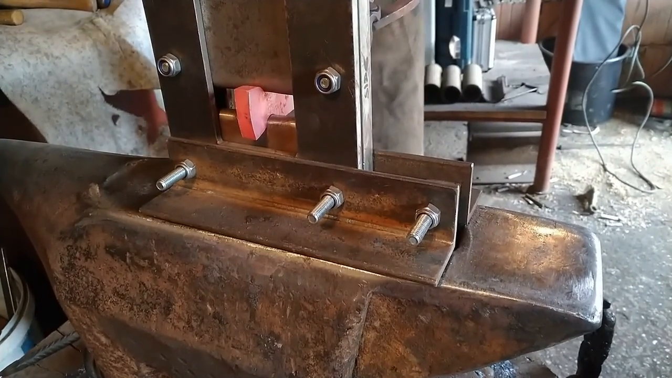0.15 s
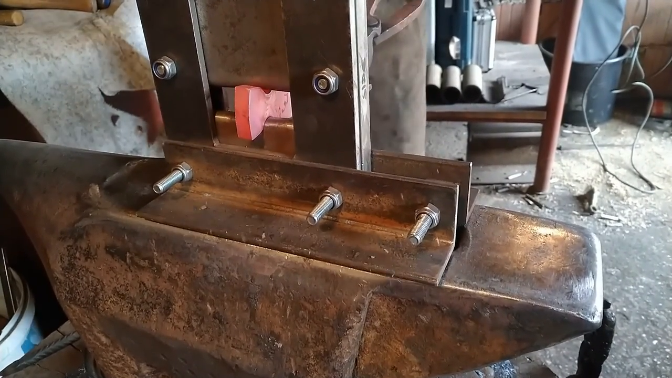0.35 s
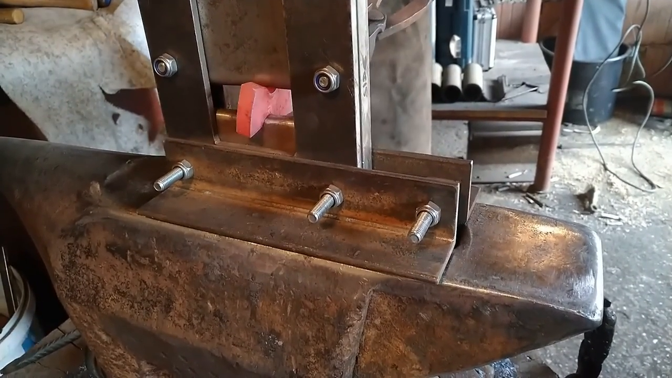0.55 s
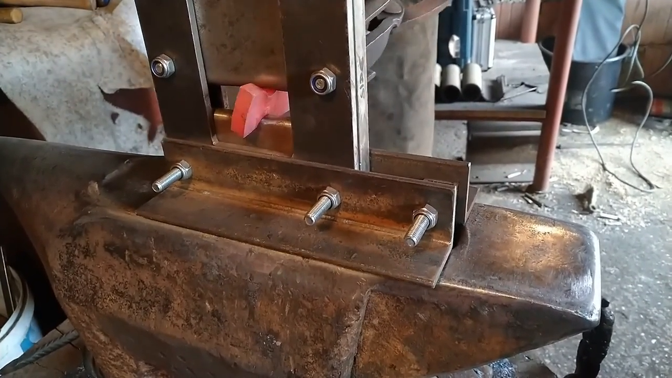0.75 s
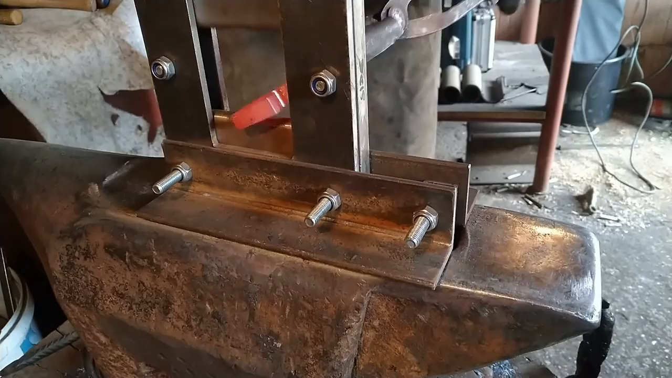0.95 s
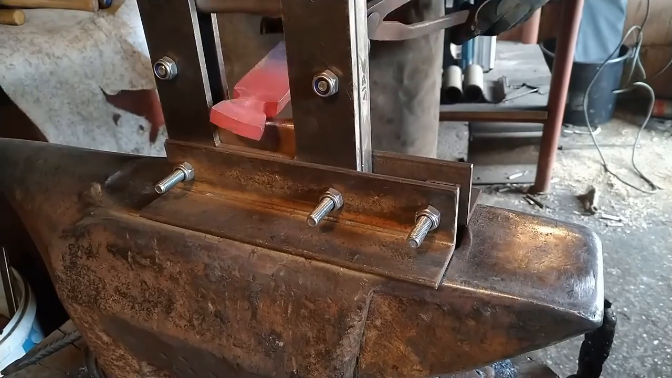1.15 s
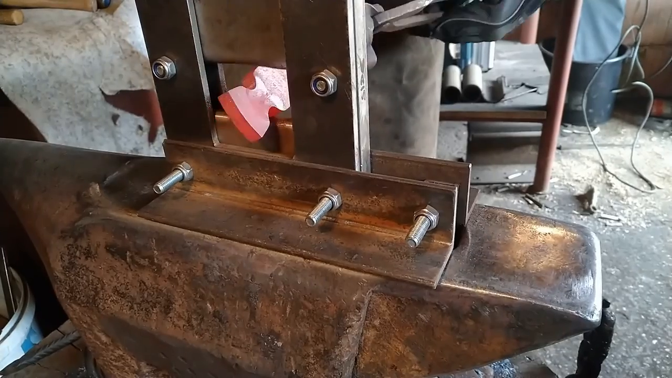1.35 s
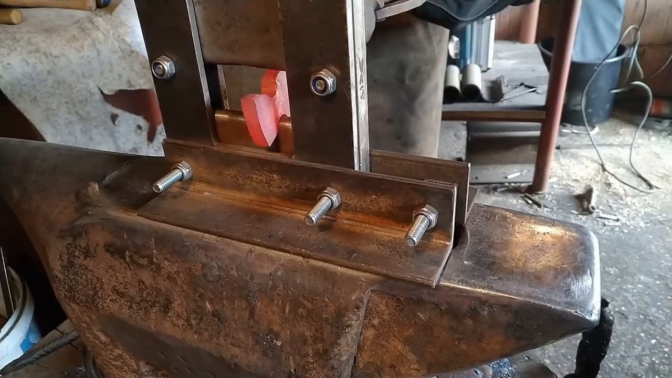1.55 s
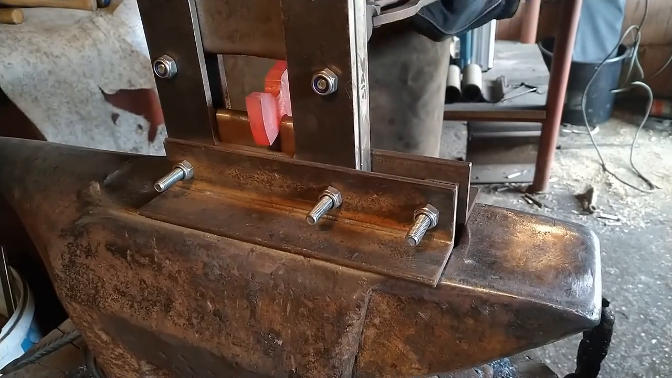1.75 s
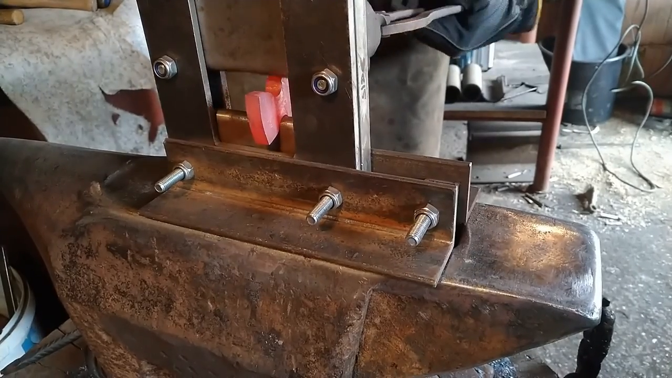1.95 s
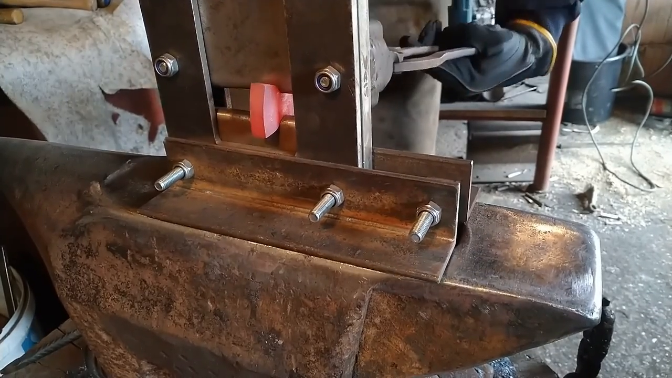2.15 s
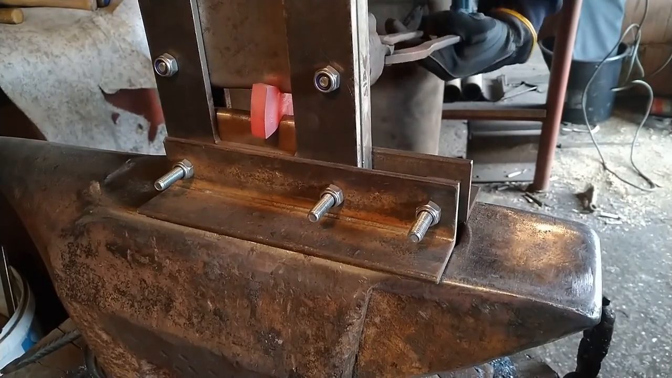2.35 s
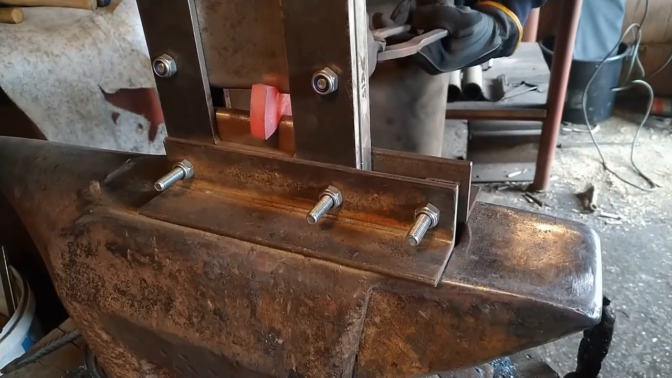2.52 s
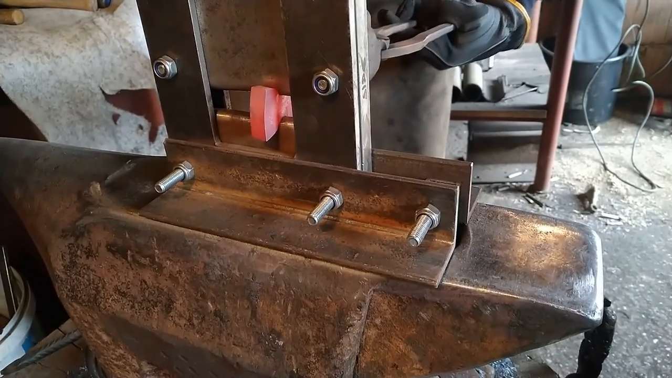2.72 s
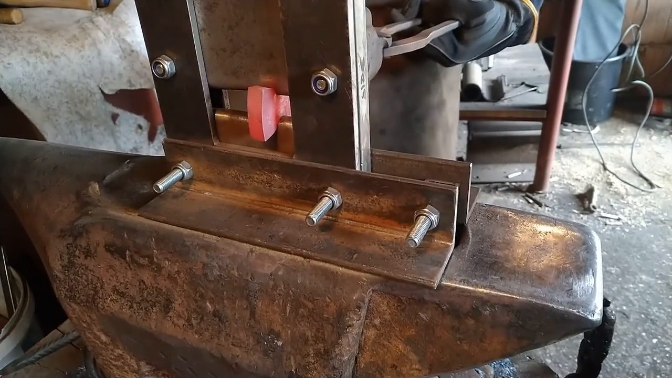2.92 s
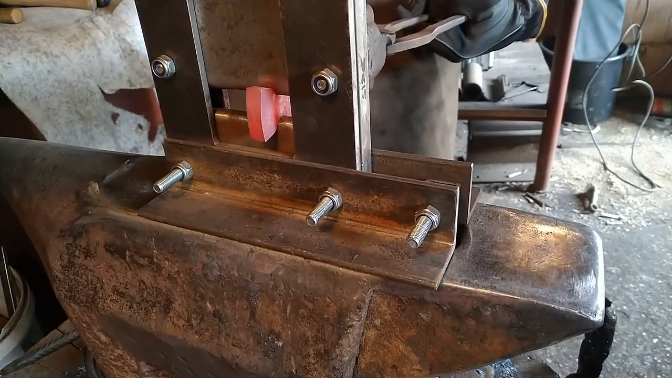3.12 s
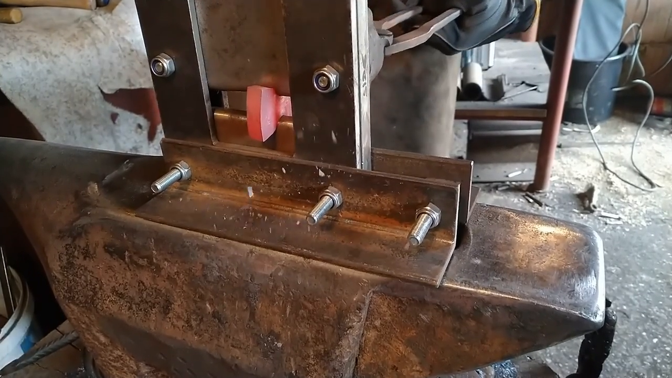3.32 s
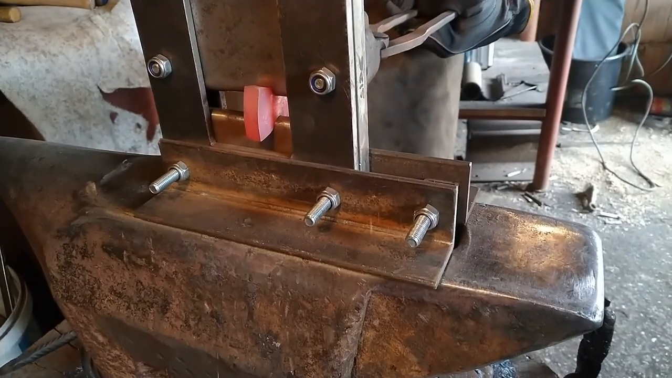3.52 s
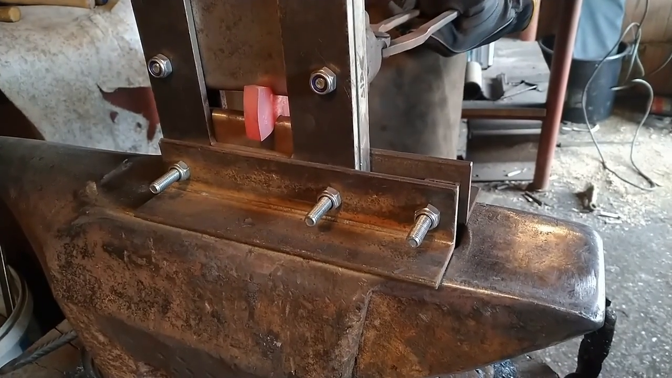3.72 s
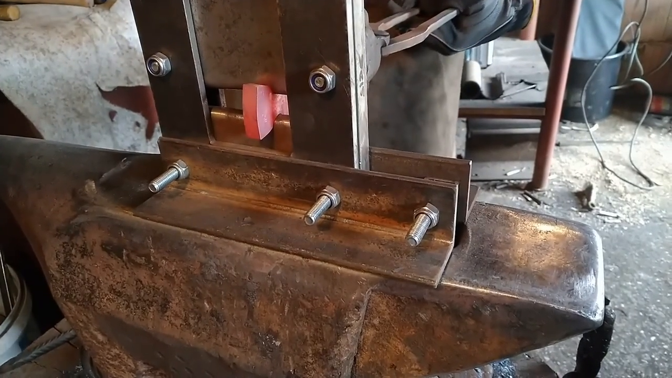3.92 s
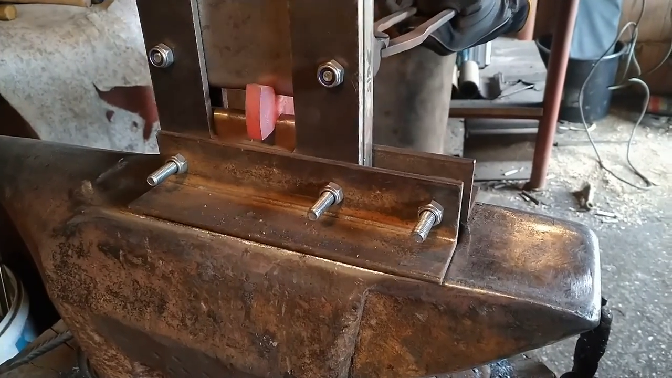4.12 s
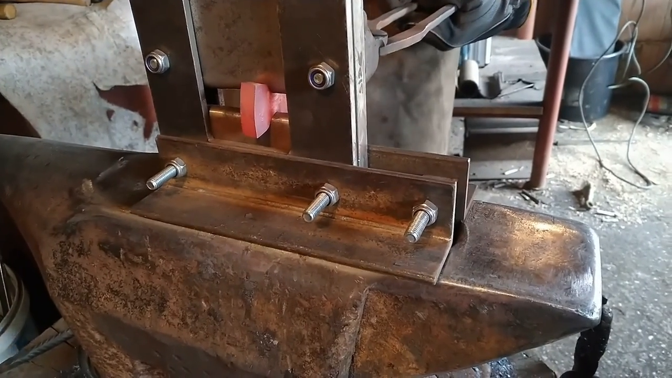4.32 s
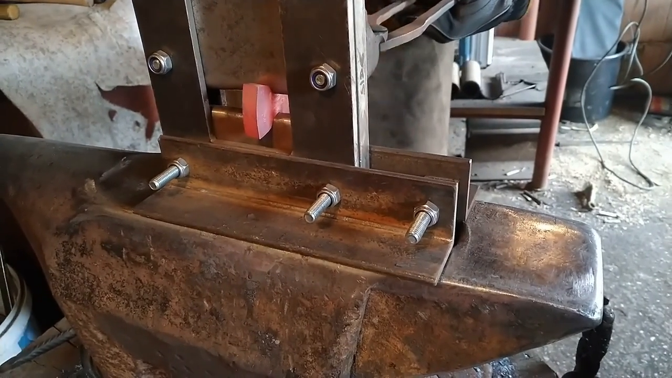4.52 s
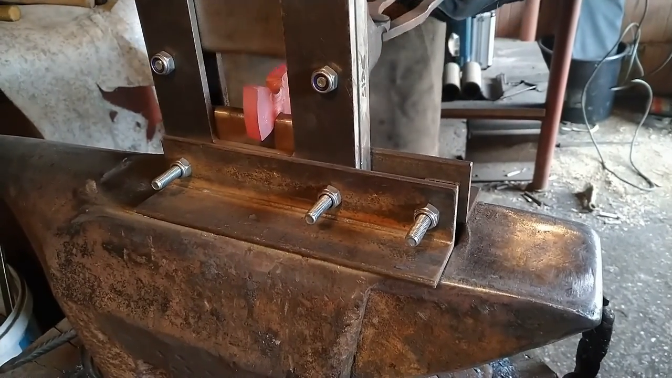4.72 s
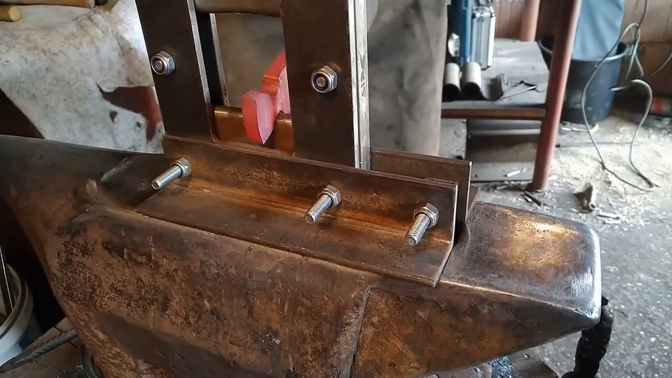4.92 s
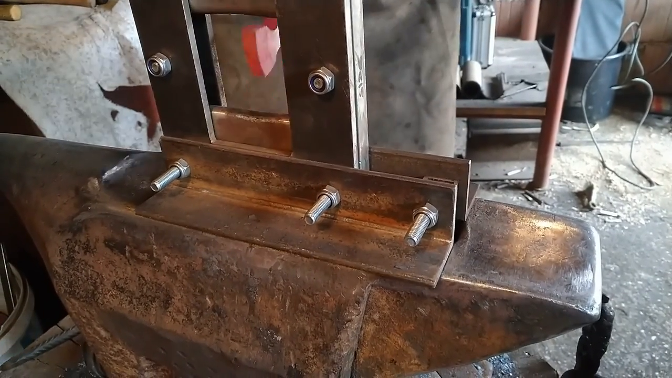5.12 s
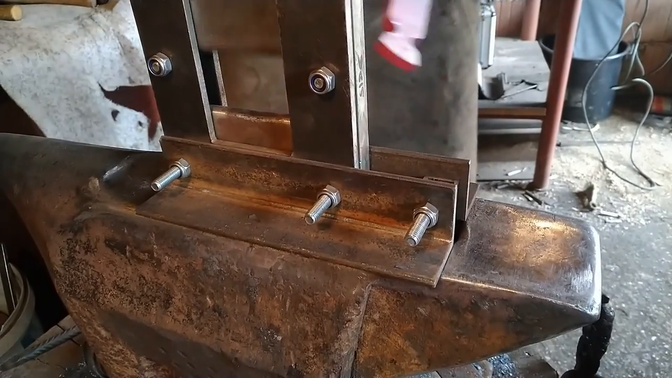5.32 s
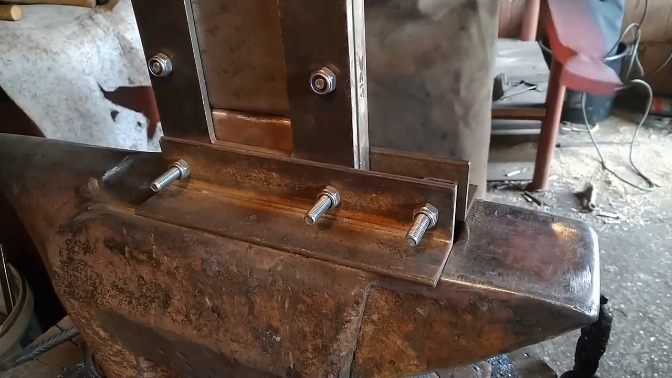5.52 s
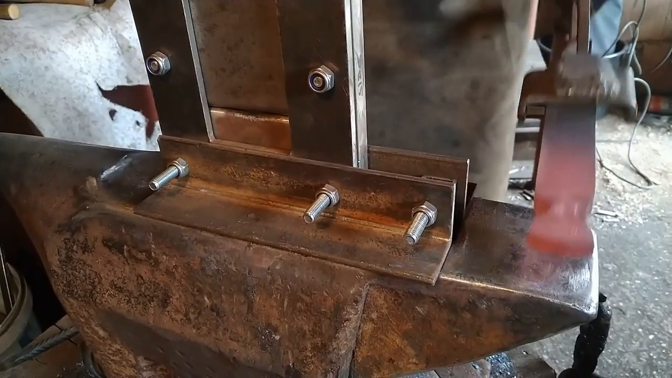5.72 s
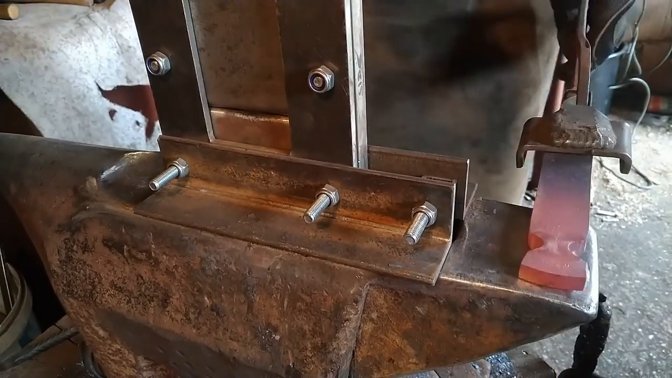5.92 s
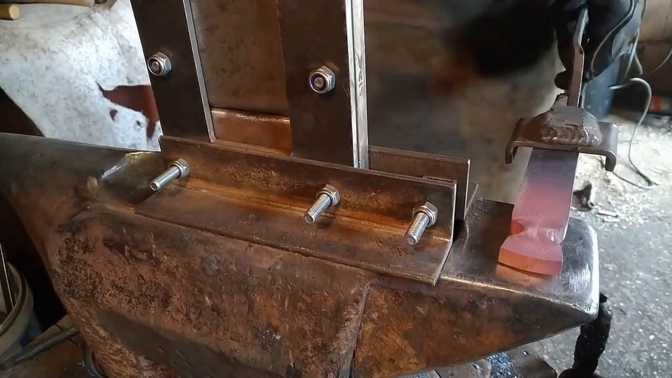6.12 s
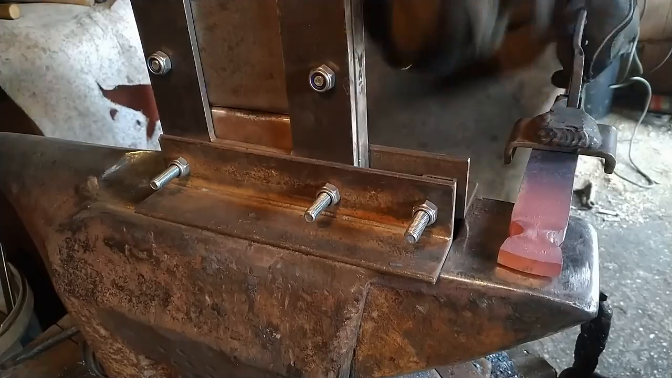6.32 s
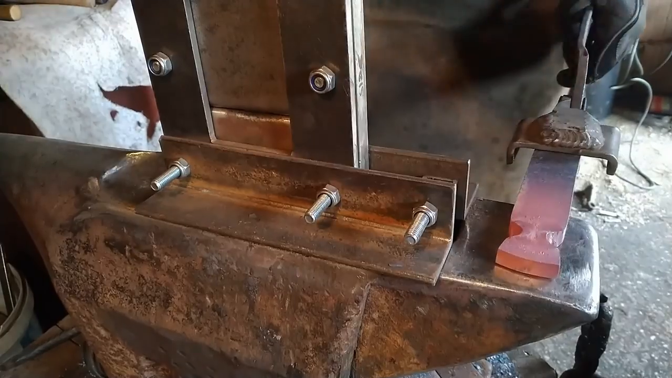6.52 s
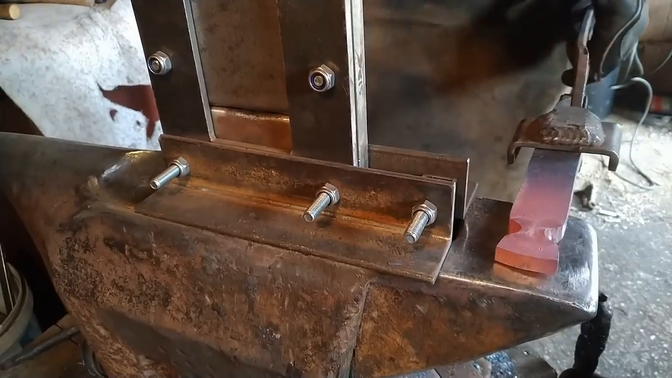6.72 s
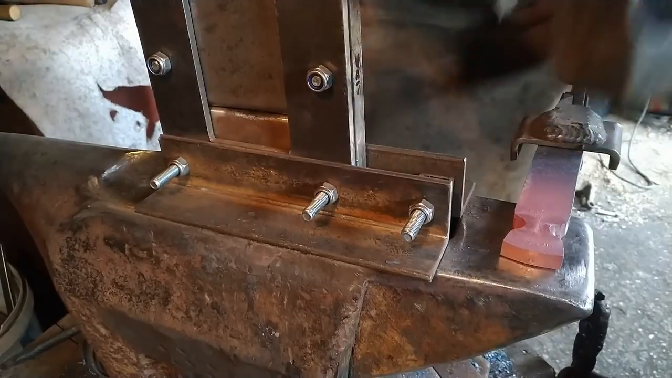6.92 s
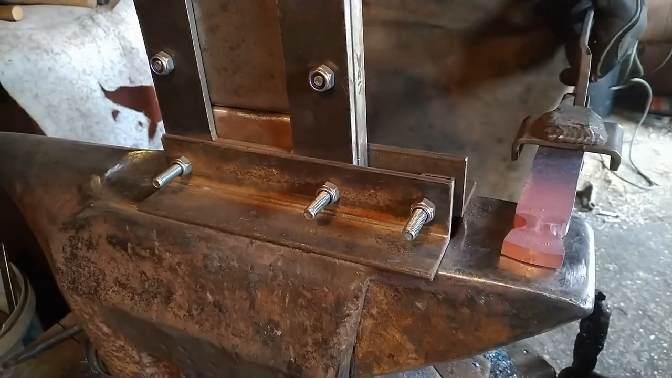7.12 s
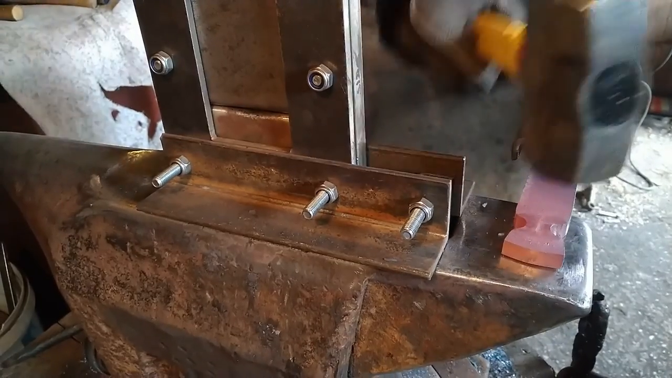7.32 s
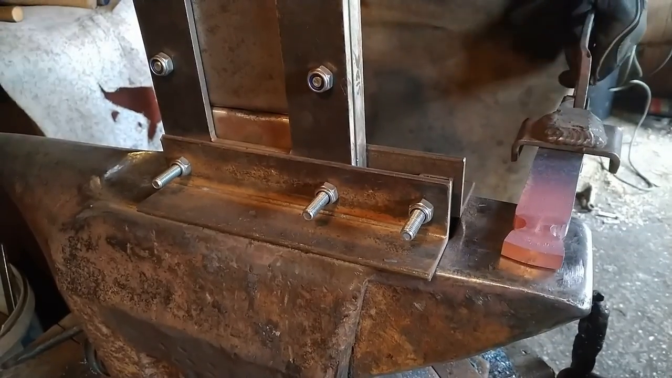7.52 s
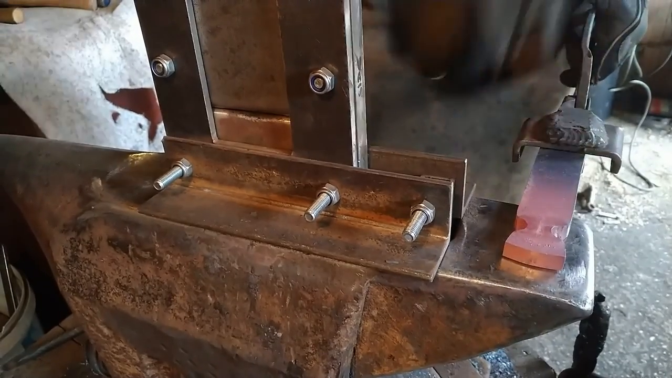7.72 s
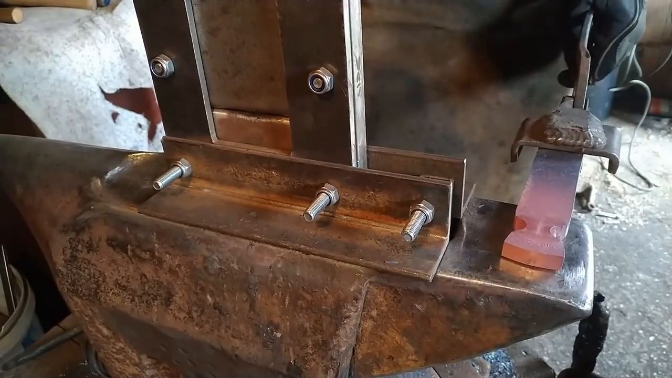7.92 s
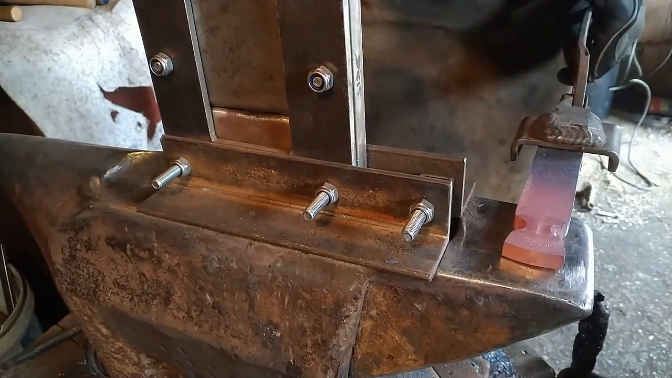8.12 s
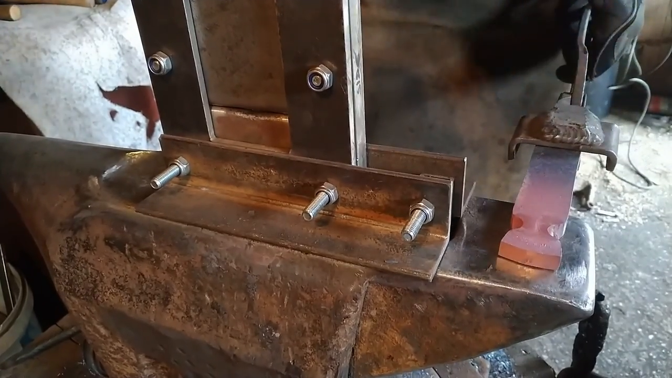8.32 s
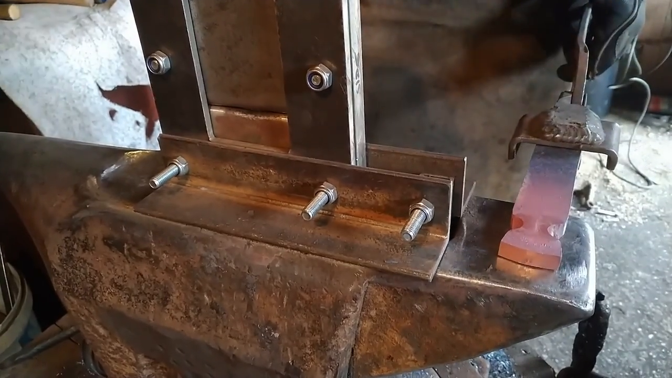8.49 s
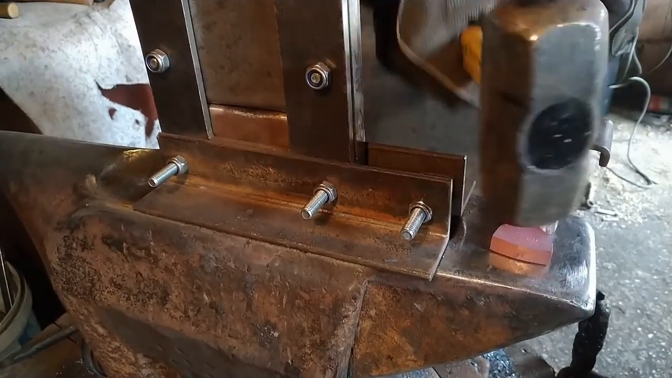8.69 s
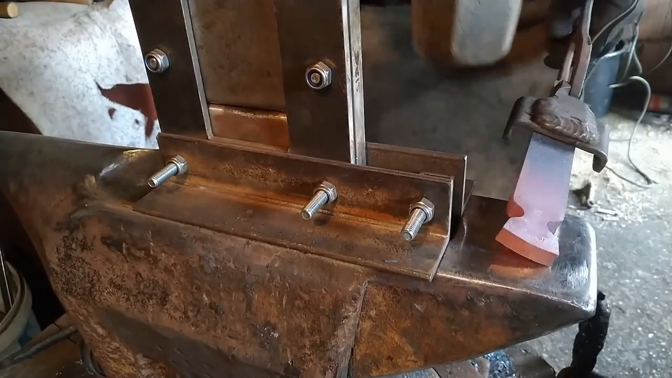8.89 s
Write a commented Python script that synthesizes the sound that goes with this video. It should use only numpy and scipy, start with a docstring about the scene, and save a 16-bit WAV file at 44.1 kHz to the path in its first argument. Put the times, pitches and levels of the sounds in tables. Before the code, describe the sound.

Close up in a small forge, crashing metallic strikes mix with clinks and scrapes before an even run of hard anvil hammering.

```python
"""A smith forges a red-hot bar in a small workshop, close to a two-port microphone.
He first hammers it between the clattering dies of a guillotine tool: crowded noise modes and ringing sines.
Between these blows the tongs clink, the bar scrapes as filtered noise and squeals once as a wavering tone;
low tones thump as the microphone overloads. The bar is drawn out and the top die drops shut with a ring;
six even blows on the anvil face follow. The recorder's limiter flattens the start of every loud blow."""
import sys
import numpy as np
from scipy import signal
from scipy.fft import rfft, irfft, next_fast_len
from scipy.io import wavfile
from scipy.ndimage import uniform_filter1d

SR = 44100
rng = np.random.default_rng(int(sys.argv[2]) if len(sys.argv) > 2 else 0)


def unload_wav(signal):
    """Save mono or channel-first audio to the path in sys.argv[1] as 16-bit WAV at rate SR, clipped to [-1, 1]."""
    wavfile.write(
        sys.argv[1],
        SR,
        np.round(np.clip(np.atleast_2d(signal).T, -1, 1) * 32767).astype(np.int16),
    )


N = 394694
CUTOFF_HZ = 16000
TIME = np.arange(N) / SR  # seconds into the scene
AGE = np.arange(24000) / SR  # seconds since a contact

# Balance of the two microphone ports. Each row: frequency in Hz, left over right in dB.
PORT_BALANCE = [(60, 0.5), (250, 5.5), (600, 8.5), (1500, 4.5), (2300, 7), (3200, -6.5), (4500, -7.5),
                (7000, -4.5), (15000, -1.5)]
# The bar slides over steel, once for each push, turn or pull.
# Each row: start in seconds, length in seconds, scraping level in dB, grinding level in dB.
STROKES = [(0.492, 0.26, -75.5, -71.5), (0.982, 0.45, -62, -65.5), (1.95, 0.61, -63.5, -88),
           (4.432, 0.18, -77, -61.5), (4.85, 0.58, -69.5, -75), (5.379, 0.091, -49.5, -45.5),
           (5.578, 0.091, -65, -82), (6.033, 0.3, -70.5, -92)]
# Colour of a light steel contact. Each row: frequency in Hz, relative level in dB per Hz.
KNOCK_COLOUR = [(30, -20), (100, -12.5), (200, 2.5), (450, -0.5), (1000, -11), (1900, 1), (2900, 0.5),
                (3900, -7.5), (5000, -6), (7200, -3), (8300, -17.5), (10000, -14), (11500, -31.5),
                (15500, -22.5)]


def from_db(db):
    """Decibels to gain."""
    return 10 ** (np.asarray(db) / 20)


def rms_one(x):
    """Scale to unit power."""
    return x / np.sqrt(np.mean(x ** 2) + 1e-20)


def at_hz(points, hz):
    """Read a table on a log-frequency axis."""
    f, value = np.transpose(points)
    return np.interp(np.log(np.maximum(hz, 1)), np.log(f), value)


def add(out, s, sound, pan_db=0):
    """Mix a sound in at a time, with the left raised over the right by pan_db."""
    start = max(round(s * SR), 0)
    sides = from_db(np.array([[pan_db], [-pan_db]]) / 2)
    out[:, start:start + sound.shape[-1]] += (rms_one(sides) * sound)[:, :N - start]


def fade(t60, age=AGE):
    """Exponential decay by 60 dB in t60 seconds."""
    return np.exp(-np.log(1000) * age / t60)


def flutter(size, step_s):
    """Random unevenness that changes about once a step; spread 1."""
    steps = np.arange(size) / (SR * step_s)
    return rms_one(np.interp(steps, np.arange(1000), rng.standard_normal(1000)))


def ripple(spread_db, width_hz):
    """A steel body's own uneven forest of resonances, weaker in the bass, as rows of Hz and dB."""
    hz = np.arange(30, CUTOFF_HZ, width_hz)
    uneven = np.clip(rng.standard_normal(len(hz)), -2, 2)
    return np.c_[hz, spread_db * hz / (hz + 1500) * uneven]


def contact(touch_db=-26, yield_s=0.0018):
    """The first touch is soft; the full shock follows."""
    return from_db(touch_db * np.clip(1 - (AGE / yield_s) ** 2, 0, 1))


def noise_spectrum(colour, size, shapes=()):
    """Random stereo spectrum of a given colour as the two ports hear it, and its frequencies."""
    # Likeness of the two ports. Each row: frequency in Hz, correlation.
    likeness = [(60, .2), (300, .35), (1000, 0.05), (15000, 0.05)]
    hz = np.fft.rfftfreq(size, 1 / SR)
    mid, side = rfft(rng.standard_normal((2, size)))
    alike = np.clip(at_hz(likeness, hz), -1, 1)
    sign = np.array([[1], [-1]])
    ports = (np.sqrt(1 + alike) * mid + sign * np.sqrt(1 - alike) * side) / np.sqrt(2)
    gain = rms_one(from_db(sum(at_hz(shape, hz) for shape in (colour, *shapes))))
    return ports * gain * from_db(sign * at_hz(PORT_BALANCE, hz) / 2), hz


def ring(modes, age=AGE):
    """Struck modes; each blow gives every mode a slightly different share, and a phase at each port."""
    hz, db, t60 = np.transpose(modes)[:, :, None]
    db = db + 1.8 * rng.standard_normal(hz.shape)
    db = db + np.array([1, -1])[:, None, None] * at_hz(PORT_BALANCE, hz) / 2
    phase = rng.uniform(0, 2 * np.pi, hz.shape)
    phase = phase + rng.uniform(-np.pi / 2, np.pi / 2, (2, len(hz), 1))
    return np.sum(from_db(db) * fade(t60, age) * np.sin(2 * np.pi * hz * age + phase), axis=1)


def clatter(colour, shapes, crack_t60, tail_db, snap_db=3, snap_t60=0.013):
    """A sharp snap, a crack of crowded modes, then a tail in the shop whose top treble dies first."""
    # Dying of the tail in the shop. Each row: frequency in Hz, t60 in seconds.
    decay = [(60, 0.42), (200, 0.29), (700, 0.22), (2700, 0.22), (6000, 0.2), (10000, 0.19), (15000, 0.044)]
    spectrum, hz = noise_spectrum(colour, len(AGE), shapes)
    centres, t60s = np.transpose(decay)
    tail = 0
    for band, t60 in zip(np.eye(len(t60s)), t60s):  # overlapping bands that sum to the whole
        share = at_hz(np.c_[centres, band], hz)
        tail = tail + irfft(spectrum * share) * fade(t60)
    crack = irfft(spectrum) * (fade(crack_t60) + from_db(snap_db) * fade(snap_t60))
    return crack + from_db(tail_db) * tail


def scraping(rough_db=3.0, slip_s=.02, attack_s=0.045, release_s=0.044):
    """Each stroke swells, holds and stops; scale catches and slips: a hiss and a narrower grinding."""
    # Hiss of the dragged bar. Each row: frequency in Hz, relative level in dB per Hz.
    drag_colour = [(60, -30), (160, 2), (450, 4.5), (750, -3.5), (1200, -10), (3000, -4.5), (4000, -14),
                   (6500, -9), (8300, -19.5), (10000, -15), (12000, -33.5), (15000, -25)]
    # Grinding of bar on die. Each row: frequency in Hz, relative level in dB per Hz.
    grind_colour = [(700, -27.5), (1400, -0.5), (2000, 9.5), (2700, -3), (3600, -13.5), (7000, -30)]
    out, age = np.zeros((2, N)), TIME[:SR]
    for s, length, hiss_db, grind_db in STROKES:
        push = np.clip(age / attack_s, 0, 1) * np.clip(1 - (age - length) / release_s, 0, 1)
        for colour, db in (drag_colour, hiss_db), (grind_colour, grind_db):
            rub = irfft(noise_spectrum(colour, SR, [ripple(spread_db=11.0, width_hz=330)])[0])
            add(out, s, rub * push * from_db(db + rough_db * flutter(SR, slip_s)), pan_db=-6.0)
    return out


def ticks(ticks_per_s=12, over_scraping_db=10.5, spread_db=4, tick_t60=.04):
    """While the bar slides, the tongs tick at uneven moments, louder in a harder stroke."""
    out = np.zeros((2, N))
    for s, length, hiss_db, _ in STROKES:
        for share, strength in rng.uniform([0, -1], 1, (round(ticks_per_s * length), 2)):
            shapes = [ripple(spread_db=1.0, width_hz=250)]
            tick = irfft(noise_spectrum(KNOCK_COLOUR, size=4096, shapes=shapes)[0])
            tick = tick * fade(tick_t60, AGE[:tick.shape[1]])
            db = hiss_db + over_scraping_db + spread_db * strength
            add(out, s + share * length, from_db(db) * tick, pan_db=-7.5)
    return out


def bumps():
    """The loose tool frame answers a shift of the bar with a dull bump of bass-heavy noise."""
    # Bumps of the frame. Each row: start in seconds, relative level in dB.
    frame_bumps = [(0.535, -53.5), (1.448, -53), (2.84, -62.5), (3.05, -61.5), (4.419, -52.5), (5.004, -60),
                   (5.195, -54)]
    # Their dull colour. Each row: frequency in Hz, relative level in dB per Hz.
    bump_colour = [(60, -21), (170, 8.5), (300, -7.5), (480, 4), (800, -17.5), (2000, -13), (6000, -29.5),
                   (12000, -41)]
    out = np.zeros((2, N))
    for s, db in frame_bumps:
        bump = clatter(bump_colour, [ripple(spread_db=0, width_hz=380)], crack_t60=0.46, tail_db=-15)
        add(out, s, from_db(db) * bump * contact(), pan_db=-3)
    return out


def background(shop_db=-68, dip_db=-19):
    """Shop hiss and rumble as coloured noise with the handling on top; all dip briefly now and then."""
    # Colour of the shop. Each row: frequency in Hz, relative level in dB per Hz.
    shop_colour = [(15, -40), (25, -20.5), (70, 1), (127, -10.5), (285, -12), (326, -16.5), (677, -19.5),
                   (818, -17.5), (1260, -27.5), (1520, -22), (2220, -26), (2410, -25.5), (6740, -24.5),
                   (16000, -43.5)]
    # Brief dips in level. Each row: centre in seconds, half length in seconds.
    level_dips = [(1.909, 0.036), (2.686, 0.015), (3.148, 0.021)]
    size = 2 * next_fast_len(N // 2 + 1)
    shop = from_db(shop_db) * irfft(noise_spectrum(shop_colour, size)[0])[:, :N]
    dips = sum(np.exp(-((TIME - s) / half) ** 4) for s, half in level_dips)
    return (shop + scraping() + bumps() + ticks()) * from_db(dip_db * dips)


def overload_thumps(thump_hz=55, thump_t60=0.088, thump_db=4):
    """A hard blow overloads the microphone: a dull thump, a quickly decaying low tone."""
    # Dull thumps. Each row: start in seconds, level in dB before thump_db.
    thumps = [(0.899, -27.5), (2.713, -24.5), (4.745, -36)]
    out = np.zeros((2, N))
    for s, db in thumps:
        thump = np.cos(2 * np.pi * thump_hz * AGE) * fade(thump_t60)
        add(out, s, from_db(db + thump_db) * thump, pan_db=-16)
    return out


def squeals(waver=0.037, overtone_db=-3):
    """As the bar turns in the die, stick and slip locks into a short wavering tone with two overtones."""
    # Squeals. Each row: centre in seconds, half length in seconds, pitch in Hz, level in dB.
    squeal_rows = [(1.768, 0.016, 1290, -57)]
    out = np.zeros((2, N))
    for s, half, hz, db in squeal_rows:
        wander = rms_one(uniform_filter1d(rng.standard_normal(len(AGE)), size=120))
        phase = 2 * np.pi * np.cumsum(hz * (1 + waver * wander)) / SR
        tone = sum(from_db(overtone_db * k) * np.sin((k + 1) * phase) for k in range(3))
        swell = np.exp(-(AGE / half - 2) ** 2)
        add(out, s - 2 * half, from_db(db) * tone * swell, pan_db=-11.0)
    return out


def bar(ring_db=-7, rebound_s=.021, rebound_loss_db=3):
    """The bar, held only by the tongs, gives a bright clink when bumped and a weaker one on the rebound."""
    # Clinks off the die. Each row: start in seconds, level in dB before ring_db.
    bar_rings = [(0.8969, -19), (4.7436, -17.5), (5.4755, -19)]
    # Modes of the bar. Each row: frequency in Hz, relative level in dB, t60 in seconds.
    bar_modes = [(4533, -3, .11), (4700, -8, .1), (4893, -4, .14), (5006, 0, .13), (5130, -3, .12),
                 (5604, -8, .1), (7402, -11, .14), (9179, -7, .13)]
    out = np.zeros((2, N))
    for s, db in bar_rings:
        for k in range(2):  # the bump, then its rebound
            gain = from_db(db + ring_db - k * rebound_loss_db)
            add(out, s + k * rebound_s, gain * ring(bar_modes) * contact(), pan_db=-5)
    return out


def tongs(force_db=-4, modes_db=-21, hump_db=11):
    """Bar and tongs knock on the tool: each contact favours the resonances around one pitch."""
    # Light steel contacts. Each row: start in seconds, level in dB before force_db, extra bass in dB,
    # extra treble in dB, ringing pitch in Hz, left over right in dB.
    knocks = [(0.202, -48.5, -9, 19, 6900, -8), (0.765, -17.5, 6, 8.5, 3350, -7.5),
              (0.777, -26.5, 15, 2, 2950, 1.5), (0.893, -15.5, -9, 7.5, 4630, -13.5),
              (1.017, -39, 6, 0, 3230, -6.5), (1.295, -43, -6, -9, 2920, -6),
              (1.614, -22.5, -2.5, -3, 4250, -1.5), (1.828, -48.5, 7, -18, 2710, -7),
              (2.02, -34.5, 3.5, -4.5, 2720, -4), (2.063, -18, 0, -2, 3220, -7),
              (2.115, -25.5, 15, 0, 2620, -6), (2.138, -23, 6.5, 7, 6300, -9.5),
              (2.148, -23.5, -13, -4, 3604, -30), (2.164, -24, 6, 11, 5940, -2),
              (2.357, -22, 3.5, 1.5, 6040, -4), (3.437, -25, 0, 2, 2930, -9),
              (3.467, -27, 1, 7.5, 3300, -4.5), (4.067, -40.5, 14.5, 0.5, 3000, -6.5),
              (4.274, -17, -1.5, -30, 2980, -1.5), (4.648, -13.5, 5.5, -15, 2760, -6),
              (4.742, -13, -28, 4, 4580, -13.5), (4.764, -14.5, -9, 4, 4750, -3.5),
              (4.899, -29, -1, 6, 3350, -1.5), (5.448, -27, -10.5, 6, 2520, -14),
              (5.874, -16, -4, 12.5, 4360, -8)]
    # Modes of the tongs. Each row: frequency in Hz, relative level in dB, t60 in seconds.
    tong_modes = [(194.3, -5.5, 0.36), (1364, -6.5, 0.15), (1792, -3.5, 0.07), (2890, -1, 0.063),
                  (3020, -0.5, 0.079), (3100, -4, 0.08), (4380, -3, 0.16), (5232, -10, 0.085),
                  (6140, -2, 0.079), (7200, -9, 0.18), (9440, -9.5, 0.11)]
    out = np.zeros((2, N))
    for s, db, bass_db, treble_db, hz, pan_db in knocks:
        tilt = [(700, bass_db), (2500, 0), (6500, 0.0054), (10000, treble_db)]
        hump = [(hz * .75, 0), (hz, hump_db), (hz / .8, 0)]
        shapes = [tilt, hump, ripple(spread_db=6.0, width_hz=88)]
        knock = clatter(KNOCK_COLOUR, shapes, crack_t60=0.044, tail_db=-13.5,
                        snap_db=9.0, snap_t60=0.0051)
        knock += from_db(modes_db) * ring(tong_modes)
        add(out, s, from_db(db + force_db) * knock * contact(yield_s=0.0025), pan_db)
    return out


def guillotine(force_db=-3.0, shop_db=-4.0, chatter_db=1, chatter_s=0.0054):
    """The top die, loose in its guides, crashes and chatters with a bright ring; at last it drops shut."""
    # Blows on the top die, the last its drop. Each row: start in seconds, level in dB before force_db,
    # clatter tail in dB before shop_db, left over right in dB, ring in dB relative to the blow.
    die_blows = [(0.297, -6, 5.6, -3, -8), (2.709, -18, 3, -3, -16.5), (3.319, -4.5, 3, -2, -9.5),
                 (4.144, -1, -1.5, -1, -12.5), (5.474, -16, 6, -3.5, -5.5)]
    # Crowd of unresolved die modes. Each row: frequency in Hz, relative level in dB per Hz.
    die_colour = [(30, -24), (75, -3), (150, -3.5), (330, -9), (520, -2.5), (900, -10.5), (2000, -8.5),
                  (2900, -7), (3900, -12.5), (6000, -6.5), (8000, -11.5), (10000, -13), (11300, -19.5),
                  (15500, -6.5)]
    # Modes of the top die. Each row: frequency in Hz, relative level in dB, t60 in seconds.
    die_modes = [(500, -14, .16), (590, -15, .16), (1890, -17, .28), (2760, -16, .22), (5450, -6, .25),
                 (6162, -2, .16), (6191, -6, .15), (6780, -9, .15), (7294, -15, .24), (9172, -6, .17),
                 (9857, 2, .12), (10590, -15, .17), (12840, -17, .14), (13825, -5, .24), (14720, -14, .12),
                 (15680, 0, .12)]
    # Beating pair of the freely ringing die. Each row: frequency in Hz, level in dB, t60 in seconds.
    drop_modes = [(13826, -33, .65), (13842, -37, .5)]
    out, body = np.zeros((2, N)), ripple(spread_db=6, width_hz=75)
    for s, db, clatter_db, pan_db, ring_db in die_blows:
        blow = clatter(die_colour, [body], crack_t60=0.075, tail_db=clatter_db + shop_db)
        blow = blow * from_db(chatter_db * flutter(len(AGE), chatter_s))
        blow = blow + from_db(ring_db) * ring(die_modes)
        add(out, s, from_db(db + force_db) * blow * contact(), pan_db)
    add(out, die_blows[-1][0], ring(drop_modes, age=TIME[:SR]))
    return out


def anvil(force_db=-3.0, modes_db=-7, hammer_db=14, hum_db=-57, tail_db=2):
    """The soft hot bar damps the blow; the hammer head sings briefly and the anvil hums on faintly."""
    # Hammer on the bar on the anvil face. Each row: start in seconds, level in dB before force_db,
    # left over right in dB, hammer ring in dB before hammer_db.
    anvil_blows = [(6.461, -15.5, 1, -21.5), (6.931, -11.5, 0, -26), (7.386, -10.5, -1.5, -23.5),
                   (7.845, -9, -4, -10.5), (8.306, -11, -1.5, -35), (8.746, -11, -2.5, -31)]
    # Crowd of unresolved anvil modes. Each row: frequency in Hz, relative level in dB per Hz.
    anvil_colour = [(30, -23), (75, -1), (150, -6), (350, -7), (700, -4.5), (1100, -8.5), (1900, -10.5),
                    (2400, -2.5), (3200, -6), (4000, -14), (6300, -7.5), (8000, -13.5), (11300, -20),
                    (15500, -11)]
    # Modes of the anvil, of its long hum and of the hammer head.
    # Each row: frequency in Hz, relative level in dB, t60 in seconds.
    anvil_modes = [(393, -12, .18), (497, -6, .2), (709, -6, .2), (743, -3, .22), (1028, -8, .18),
                   (2259, -5, .2), (2424, -8, .2), (2476, -10, .2), (2560, -7, .2), (2638, -10, .18),
                   (2993, -6, .19), (3168, -3, .18), (3315, -3, .2), (3250, -8, .19), (6545, -15, .17),
                   (8872, -20, .13), (15630, -14, .08)]
    hum_modes = [(813, -3, 1.6), (2760, -4, 1.0), (2159, -5, 1.3), (2234, -4, 1.3), (2471, 0, 1.2),
                 (2525, -3, 1.2), (2654, -2, 1.2), (3305, -4, 1.0), (6406, -2, 1.6)]
    hammer_modes = [(5993, 0, .14)]
    out, body = np.zeros((2, N)), ripple(spread_db=5.5, width_hz=55)
    for s, db, pan_db, ring_db in anvil_blows:
        blow = clatter(anvil_colour, [body], crack_t60=0.065, tail_db=tail_db)
        blow += from_db(modes_db) * ring(anvil_modes)
        blow += from_db(hammer_db + ring_db) * ring(hammer_modes)
        add(out, s, from_db(db + force_db) * blow * contact(), pan_db)
        add(out, s, from_db(db + hum_db) * ring(hum_modes, age=TIME[:SR]), pan_db)
    return out


def scene():
    """All sources together at the microphone."""
    return background() + overload_thumps() + squeals() + bar() + tongs() + guillotine() + anvil()


def limiter(x, ceiling_db=-16.0, release_db_per_s=400, window_s=0.0016):
    """The gain drops at once when the short-term level passes the ceiling, then recovers quickly."""
    power = uniform_filter1d(np.mean(x ** 2, axis=0), max(int(window_s * SR), 1))
    over = np.maximum(10 * np.log10(np.maximum(power, 1e-12)) - ceiling_db, 0)
    recovery = release_db_per_s * TIME
    held = np.maximum.accumulate(over + recovery) - recovery
    return x * from_db(-held)


def record(dry):
    """The recorder: limiter, rounded peaks, and a steep cut of the top treble."""
    rounded = .6 * np.tanh(limiter(dry) / .6)
    top_cut = signal.ellip(10, .1, 80, CUTOFF_HZ, fs=SR, output="sos")
    return signal.sosfilt(top_cut, rounded)


dry = scene()
out = record(dry)
unload_wav(out)
```